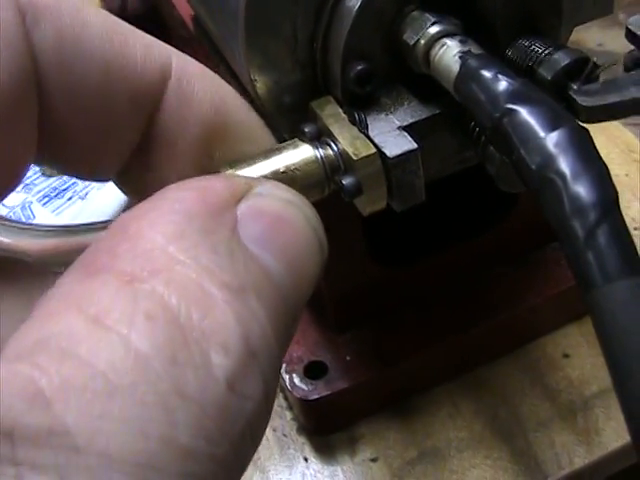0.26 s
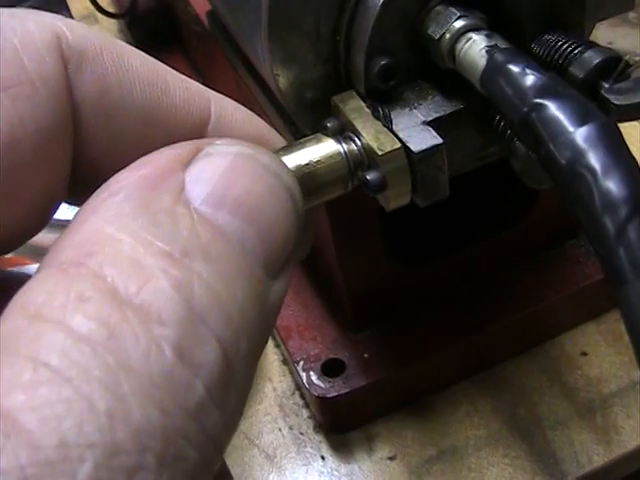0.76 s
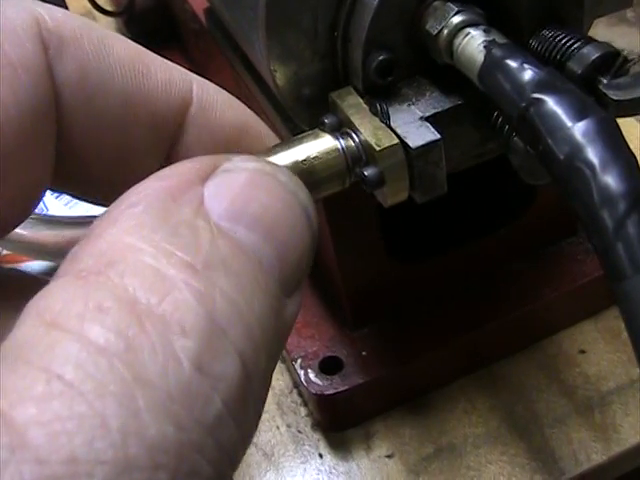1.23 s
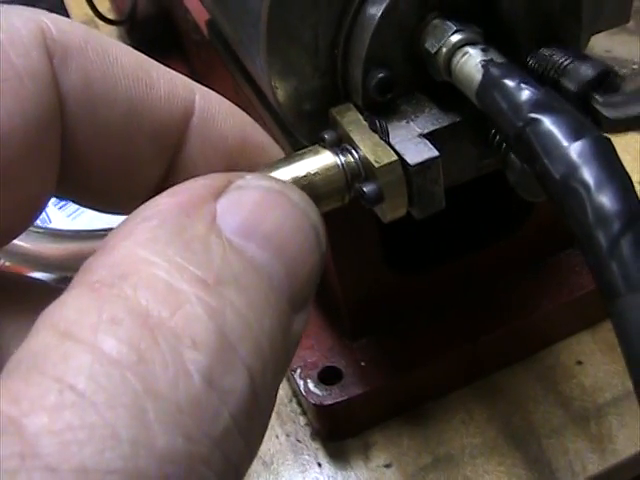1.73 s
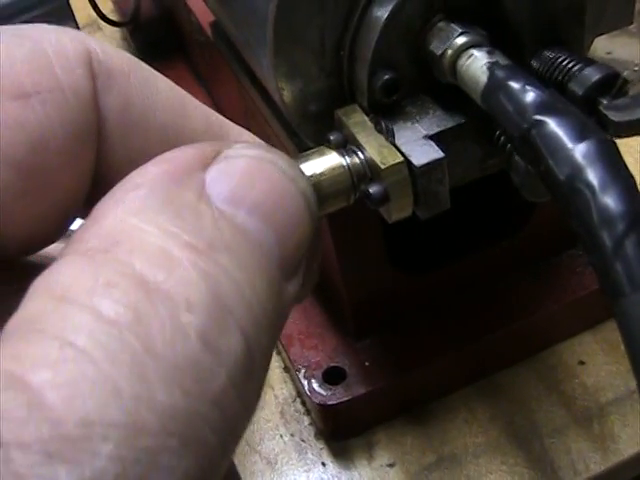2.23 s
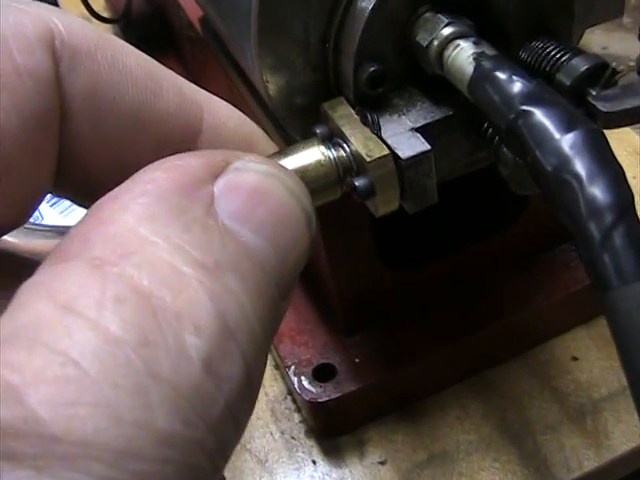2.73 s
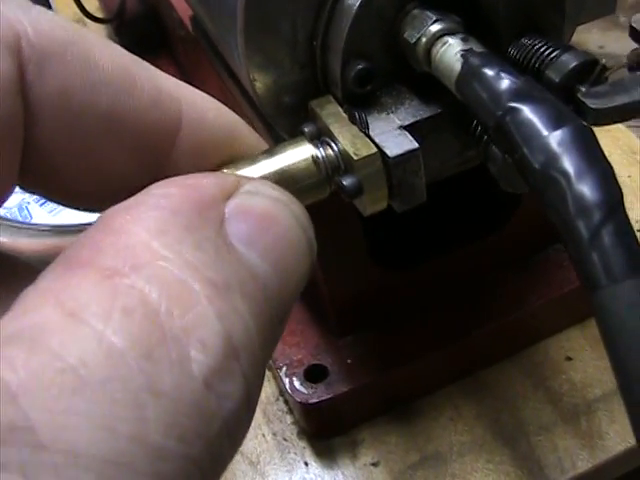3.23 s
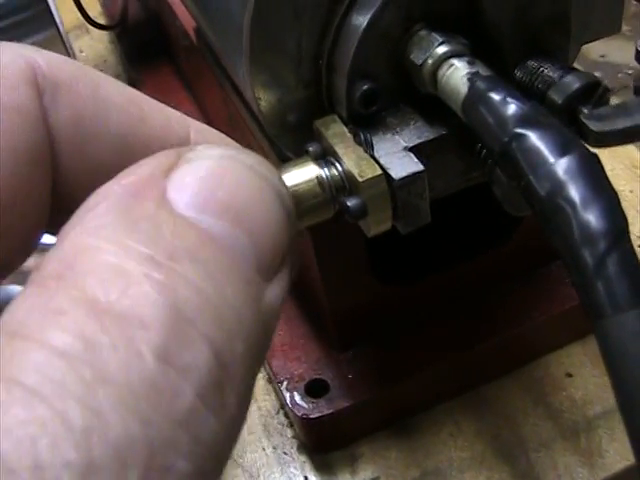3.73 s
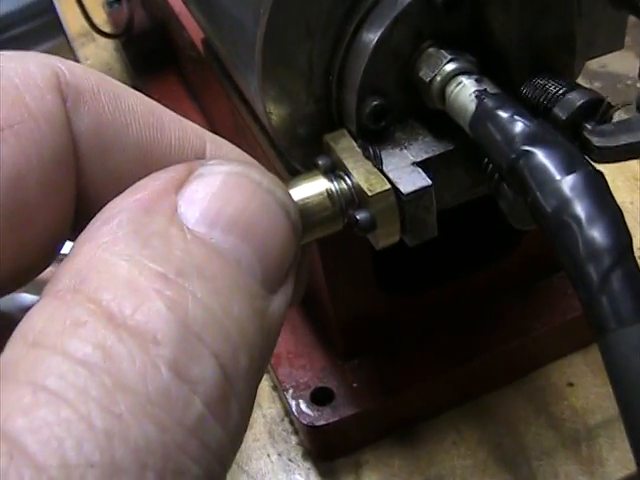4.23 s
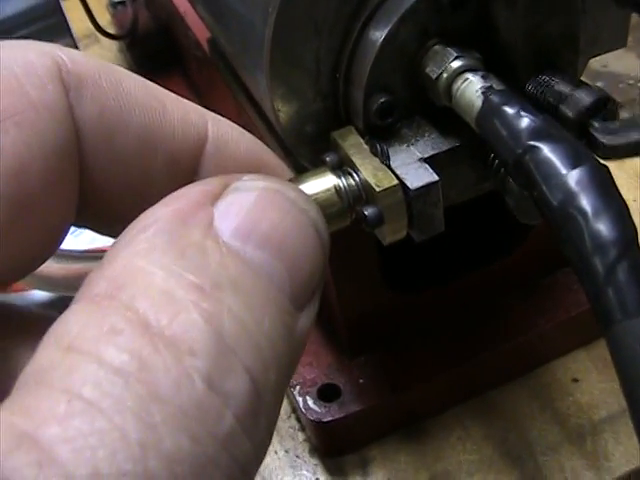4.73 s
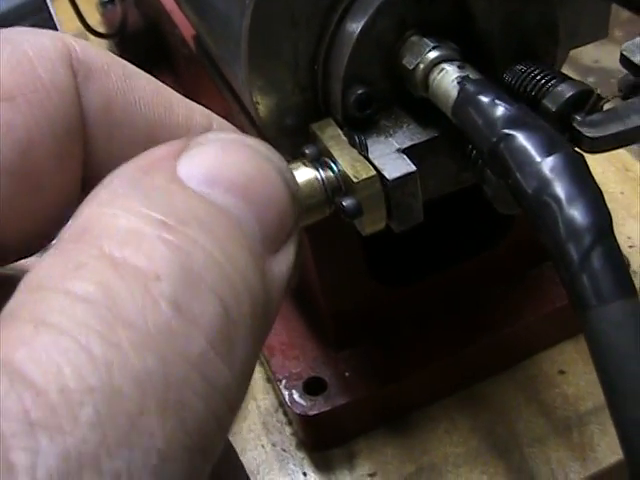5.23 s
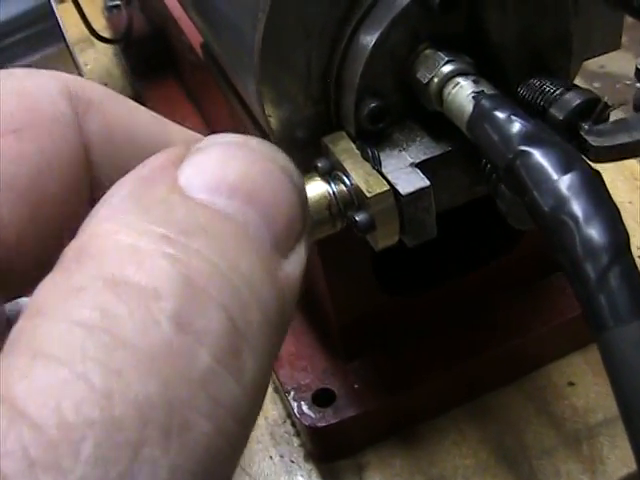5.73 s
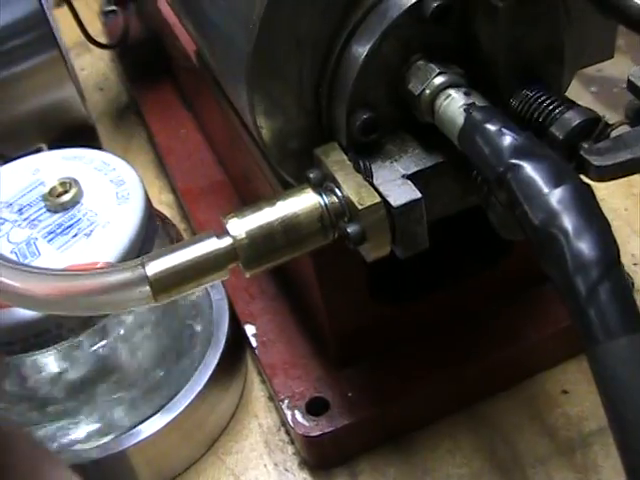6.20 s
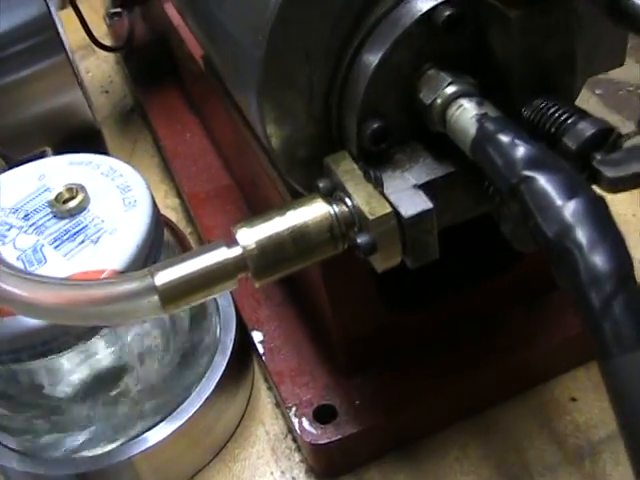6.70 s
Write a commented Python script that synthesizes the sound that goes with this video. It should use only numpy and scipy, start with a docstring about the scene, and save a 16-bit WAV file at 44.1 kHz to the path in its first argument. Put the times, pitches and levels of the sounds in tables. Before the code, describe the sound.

Close mechanical hum, rattling gears and rhythmic airy chuffing from a small single-cylinder engine, which slows and fires in irregular, clipped pops.

```python
"""Heard very close: a small hit-and-miss engine on a wooden bench coasts, then slows and fires in sharp pops.
Coasting, the governor holds the exhaust valve open: the piston pumps air through resonances and parts knock.
As the mixture is turned it slows; air whistles past a fluttering intake valve and pops are pulse plus gas jet.
The gear hums and rattles as shaken resonances; steel parts tick as short noise bursts.
A limiter ducks after peaks above full scale, too late to keep the front of a loud pop from clipping."""
import sys
import numpy as np
from scipy import signal
from scipy.fft import rfft, irfft
from scipy.io import wavfile
from scipy.ndimage import uniform_filter1d

SR = 44100
rng = np.random.default_rng(int(sys.argv[2]) if len(sys.argv) > 2 else 0)


def store_pcm(level_fs):
    """Save levels as 16-bit WAV."""
    pcm = np.round(np.clip(level_fs, -1, 1) * 32767).astype(np.int16)
    wavfile.write(sys.argv[1], SR, np.atleast_2d(pcm).T)


N = 306927
T = np.arange(N) / SR


def amp(db):
    """Level law: decibels to amplitude gain."""
    return 10 ** (np.asarray(db) / 20)


def unit(x):
    """Power normalisation: scales to rms 1."""
    return x / np.sqrt(np.mean(x ** 2) + 1e-20)


def noise():
    """White noise: equal power at all frequencies, for the whole scene."""
    return rng.standard_normal(N)


def add(mix, s, sound):
    """Superposition: adds a sound into the mix at time s."""
    part = mix[max(round(s * SR), 0):][:len(sound)]
    part += sound[:len(part)]


def colour(x, spectrum, size=4096):
    """Minimum-phase filtering to a (Hz, dB) outline; white noise keeps its power."""
    hz, db = np.transpose(spectrum)
    bin_hz = abs(np.fft.fftfreq(size, 1 / SR)) + 1
    log_gain = np.log(amp(np.interp(np.log(bin_hz), np.log(hz), db)))
    min_phase = np.exp(np.conj(signal.hilbert(log_gain)))
    taps = np.fft.ifft(min_phase).real[:size // 2]
    return signal.oaconvolve(x, taps / np.linalg.norm(taps))[:len(x)]


def resonate(x, hz, width):
    """Simple resonance: complex output with gain 1 at a centre that may move."""
    turn = np.exp(2j * np.pi * np.cumsum(hz * np.ones(N)) / SR)
    r = np.exp(-np.pi * width / SR)
    return turn * signal.lfilter([1 - r], [1, -r], x / turn + 1e-18)


def ring(x, modes):
    """Modal superposition: x excites decaying sines; white noise keeps its power."""
    t = np.arange(SR // 5) / SR
    taps = np.zeros(len(t))
    for hz, width, db in modes:
        taps += amp(db) * width * np.exp(-np.pi * width * t) * np.sin(2 * np.pi * hz * t)
    return signal.oaconvolve(x, taps / np.linalg.norm(taps))[:N]


def waver(modes, steady_s):
    """Random excitation: noise-driven resonances beat quickly but keep their strength over steady_s."""
    z = np.zeros(N, complex)
    for hz, width, db in modes:
        shaken = resonate(resonate(noise(), hz, width), hz, width * 4)
        z += amp(db) * np.sqrt(width) * shaken
    power = uniform_filter1d(abs(z) ** 2, int(steady_s * SR) + 1)
    return unit(z.real / np.sqrt(power + 1e-12))


def around(place, outline):
    """Periodicity: reads a (place, dB) outline that repeats every cycle."""
    return np.interp(place, *np.transpose(outline), period=1)


def hump(x, centre, width):
    """Gaussian swell: a smooth rise and fall around one centre."""
    return np.exp(-((x - centre) / width) ** 2)


# Four-stroke cycles. Each row: top dead centre in seconds, exhaust valve held open (0 or 1),
# relative air level in dB, relative knock strength in dB.
CYCLES = [(-.085, 1, -27.5, 2), (0.1153, 1, -29, 1), (0.3138, 1, -29, 0.5), (0.5198, 1, -29, -0.5),
          (0.7281, 1, -30.5, 2.5), (0.9456, 1, -29.5, 2.5), (1.1693, 1, -30, 1.5), (1.402, 0, -31, 6.5),
          (1.6193, 1, -30.5, -1), (1.7903, 1, -29, -2), (1.9673, 1, -29.5, -1.5), (2.151, 1, -29, -3),
          (2.3361, 1, -28, -0.5), (2.5276, 1, -28.5, -1.5), (2.7231, 1, -30, -1), (2.9262, 1, -27.5, 1.5),
          (3.1352, 1, -28, 0.5), (3.3507, 1, -28.5, -0.5), (3.5696, 1, -29, 0), (3.8006, 1, -28.5, -1),
          (4.039, 0, -22, -4), (4.291, 0, -25, -5), (4.544, 0, -22, 0.5), (4.825, 0, -24, 0),
          (5.146, 0, -20.5, -2), (5.492, 0, -24.5, -3.5), (5.817, 0, -21.5, -3.5), (6.172, 0, -28.5, -4),
          (6.488, 0, -20, 0.5), (6.82, 0, -25, -8), (7.15, 0, -27, -5)]


def crank():
    """Kinematics: place in the cycle (0-1), cycles a second, valve held open (0-1) and air gain."""
    s, held, air_db, _ = np.transpose(CYCLES)
    turns = np.interp(T, s, np.arange(len(s)))
    cycle = turns.astype(int)
    speed = np.interp(T, (s[1:] + s[:-1]) / 2, 1 / np.diff(s))
    held_smooth = uniform_filter1d(np.round(held[cycle]), size=200)
    air = amp(uniform_filter1d(air_db[cycle], size=200))
    return turns % 1, speed, held_smooth, air


def cycles():
    """Cycle timing: each as (start s, length s, valve held open 0/1, relative knock strength dB)."""
    return [(s, after[0] - s, round(held), db)
            for (s, held, _, db), after in zip(CYCLES, CYCLES[1:])]


# Hum of the running gear. Each row: time in seconds, relative level in dB.
HUM = [(0.0, -15), (0.8, -16.0), (2.72, -15.5), (4.24, -16), (4.4, -19), (4.64, -13.5), (4.72, -20),
       (4.88, -12.5), (5.04, -21.5), (5.12, -13.5), (5.36, -24.5), (5.52, -17.5), (5.6, -25.5),
       (5.84, -14.0), (6.0, -23.5), (6.32, -21.5), (6.56, -16), (6.72, -27), (6.88, -15.5), (6.95, -23)]
# Swell of the hum through a coasting cycle. Each row: place (0-1), change in dB.
HUM_SWELL = [(0, 0), (.1, 1), (.19, 0.5), (.3, 0), (.45, -3.5), (.52, 2), (.7, 0), (.78, 3.5), (.87, 1)]
# Main hum resonances. Each row: frequency in Hz, width in Hz, relative level in dB.
HUM_MODES = [(438.9, 22, 1.5), (464.6, 26.4, -2), (493.2, 26, -12.5)]
# Broad rumble around the hum. Each row: frequency in Hz, relative density in dB per Hz.
RUMBLE_SPECTRUM = [(25, -37), (70, -7), (160, -17.5), (240, -21), (340, 1), (450, -4), (600, -3.5),
                   (740, -10), (1050, -19), (1800, -15), (3000, -27.5), (7000, -26.5), (11000, -35),
                   (16000, -81)]
# Overtones of the gear. Each row: frequency in Hz, width in Hz, relative level in dB.
GEAR_MODES = [(810, 24, 3), (871, 26, 8), (1177, 32, -2), (1431, 41, 4.5), (1980, 60, -8), (4530, 40, -31)]
# Low drone of the bench. Each row: time in seconds, relative level in dB.
DRONE = [(0, -41.5), (.6, -34.5), (.95, -30.5), (1.8, -35.5), (3.2, -33), (4, -34), (5.2, -31.5),
         (6.3, -39.5), (6.96, -30)]
# The piston shoves the bench once a turn while coasting. Each row: place (0-1), change in dB.
DRONE_COASTING = [(0, -6.5), (.13, 1), (.3, -4), (.45, -5), (.6, 1), (.8, -2.5)]
# Shove on the bench in a working cycle. Each row: place (0-1), change in dB before the working boost.
DRONE_WORKING = [(.07, 3), (.25, -8.5), (.39, -6.5), (.5, -6), (.72, 0), (.9, -10.5)]


def running_gear(place, speed, held, wander_db=0.94, wander_hz=7, working_boost_db=3):
    """Forced vibration: gears and flywheels shake a resonance cluster, weaker overtones and the bench."""
    slow_noise = resonate(resonate(noise(), wander_hz, wander_hz), wander_hz, wander_hz).real
    wander = wander_db * unit(slow_noise)
    hum_db = np.interp(T, *np.transpose(HUM)) + held * around(place, HUM_SWELL) + wander
    hum = amp(hum_db) * waver(HUM_MODES, steady_s=0.056)
    effort = speed / 5  # faster running is louder
    rumble = amp(-30.5) * colour(noise(), RUMBLE_SPECTRUM)
    overtones = amp(-33.5) * ring(noise(), GEAR_MODES)
    working_db = working_boost_db + around(place, DRONE_WORKING)
    shove_db = held * around(place, DRONE_COASTING) + (1 - held) * working_db
    drone_gain = amp(np.interp(T, *np.transpose(DRONE)) + shove_db)
    drone = drone_gain * waver([(114.2, 7.7, 0)], steady_s=0.14)
    return hum + effort * (rumble + overtones) + drone


# Spectrum of rattles and knocks. Each row: frequency in Hz, relative density in dB per Hz.
KNOCK_SPECTRUM = [(300, -20.5), (800, 1.5), (1500, 7.5), (2600, 5), (3300, -2), (5000, 0), (7000, -3.5),
                  (10000, -15.5), (16000, -40)]
# Ringing of the iron frame. Each row: frequency in Hz, width in Hz, relative level in dB.
FRAME = [(1250, 25, -17), (1480, 17, 10.5), (1755, 63, -12.5), (2041, 65, 4), (2546, 132, 2.5),
         (3020, 110, -4), (3850, 540, -5.5), (4546, 51, 1)]


def backlash(place, speed, per_s=300, spread_db=4, top_hz=6500):
    """Random impacts: gear teeth rattle most where the piston turns round and the load reverses."""
    strength = amp(spread_db * np.minimum(rng.exponential(1, N), 3))
    clicks = (rng.random(N) < per_s / SR) * strength
    t = np.arange(SR // 50) / SR
    energy = signal.oaconvolve(clicks ** 2, np.exp(-t / 0.0012))[:N]
    chatter = unit(np.sqrt(abs(energy)) * noise())
    reversal = np.cos(4 * np.pi * (place + 0.028)) ** 2
    chatter *= (0.11 + reversal) * (speed / 5) ** 1.07
    rattle = amp(-35) * colour(chatter, KNOCK_SPECTRUM) + amp(-37.0) * ring(chatter, FRAME)
    return signal.sosfilt(signal.butter(3, top_hz, fs=SR, output="sos"), rattle)


# Hiss past the intake valve. Each row: frequency in Hz, relative density in dB per Hz.
INTAKE_SPECTRUM = [(400, 11), (1500, 3.5), (2900, -3), (3700, 7), (5300, 2), (6000, 0.5), (7800, 2),
                   (9300, 2.5), (10200, -5.5), (13000, -1.5), (16000, -5.5)]
# Leak of compressed charge. Each row: frequency in Hz, relative density in dB per Hz.
LEAK_SPECTRUM = [(800, -24), (1600, -1), (2400, -6), (4000, -22), (6500, 0), (8500, 9), (10500, -3),
                 (14000, 4), (16000, -2)]


def intake_air(place, held, air, flutter_hz=117):
    """Flow modulation: on a working cycle the intake valve flutters and whistles; then the charge leaks."""
    suck = np.interp(place, [.005, .03, .15, .19, .24], [0.099, 0.98, 0.71, 0.54, 0.055])
    unsteady_hz = flutter_hz * (1 + 1.5 * uniform_filter1d(noise(), size=900))
    flutter = 1 + .55 * np.cos(2 * np.pi * np.cumsum(unsteady_hz) / SR)
    hiss = amp(-1.0) * colour(noise() * flutter * suck, INTAKE_SPECTRUM)
    whistle_gain = amp(np.interp(T, [4.9, 5.2], [-6, -13]))  # fades as the collar is turned
    whistle = whistle_gain * ring(noise() * suck ** 2, [(9130, 67, 0)])
    leak = amp(-13.5) * colour(noise() * hump(place, centre=0.49, width=0.067), LEAK_SPECTRUM)
    return (1 - held) * air * (hiss + whistle + leak)


# Resonances of the exhaust passage. Each row: frequency in Hz, width in Hz, relative level in dB.
PIPE = [(1920, 1200, -5.5), (4874, 530, 0.5), (5867, 215, 3.5), (6800, 2600, -12), (8340, 350, -3.5),
        (9580, 570, -10.5), (11000, 220, -10), (13900, 460, -15), (15500, 800, -13.5)]
# Air in each of the four strokes. Each entry: relative level in dB.
STROKE_DB = [1.8, -1.5, 2.5, -2]


def exhaust_air(place, held, air, rod=0.12, shift=0.0034):
    """Turbulent flow noise: the piston pumps air; fast flow is brighter and pulls the pipe resonances."""
    angle = 4 * np.pi * place
    flow = np.sin(angle) * (1 + rod * np.cos(angle))  # the connecting rod: faster piston near the head
    stroke = amp(np.array(STROKE_DB)[(place * len(STROKE_DB)).astype(int)])
    valve = held + (1 - held) * amp(-11.5) * (place > 3 / 4)  # working: open in the last stroke only
    out = np.zeros(N)
    for hz, width, db in PIPE:
        rush = noise() * (abs(flow) + 0.064) ** (1.37 + hz / 9000) * stroke * valve * air
        centre_hz = hz * (1 + shift * np.tanh(2 * flow))
        out += amp(db) * resonate(resonate(rush, centre_hz, width), centre_hz, width * 3).real
    return amp(15.5) * out


# Valve spring left ringing by a hard blow. Each row: start in seconds, frequency in Hz, relative level in dB.
SPRING = [(1.429, 8200, -29), (5.146, 4500, -37), (5.82, 4530, -35)]


def spring(decay_s=0.05):
    """Free vibration: a thin steel tone dies away exponentially after the blow."""
    t, out = np.arange(SR // 2) / SR, np.zeros(N)
    for s, hz, db in SPRING:
        add(out, s, amp(db) * np.exp(-t / decay_s) * np.sin(2 * np.pi * hz * t))
    return out


def contacts(rows, rise_s, decay_s, tail_db, tail_s):
    """Impact noise: each loose contact builds up, chatters for a few milliseconds and dies away."""
    t, out = np.arange(SR // 10) / SR, np.zeros(N)
    decay = np.exp(-t / decay_s) + amp(tail_db) * np.exp(-t / tail_s)
    shape = (1 - np.exp(-(t / rise_s) ** 2)) * decay
    for s, db in rows:
        add(out, s, amp(db) * shape / shape.max() * rng.standard_normal(len(t)))
    return out


# Knocks of rod, cam and push rod. Each row: valve held open (0 or 1) when it sounds, place (0-1),
# relative level in dB, treble against that level in dB.
KNOCKS = [(1, 0, -21, -23), (1, .2, -24.5, -13), (1, .52, -19.5, -4), (1, 0.8, -30.5, -17),
          (1, .712, -15, -7), (1, .952, -11.5, -2.5), (0, 0, -19, -6), (0, 0.1, -15, -14),
          (0, .5, -33.5, 13), (0, .67, -26, -12)]
# Further ticks and knocks heard on their own, outside the rules. Each row: time in seconds, relative level in
# dB.
TICKS = [(4.1694, -15.5), (4.4163, -19), (4.4627, -22.5), (4.6718, -15.5), (4.7535, -22.5), (4.892, -24),
         (4.9493, -21), (5.039, -23.5), (5.7074, -25), (6.1741, -20.5), (6.549, -21), (6.669, -23.5)]
# Ignition contact closing and opening. Each row: place (0-1), relative level in dB.
CONTACT = [(.382, -25.5), (0.899, -26.5)]
# Spectrum of small ticks. Each row: frequency in Hz, relative density in dB per Hz.
TICK_SPECTRUM = [(1000, 11), (4000, 4), (5200, 5.5), (6700, 12.5), (8000, 8.5), (11000, -0.5), (12700, 2),
                 (16000, -2)]
# Spectrum of the governor pawl. Each row: frequency in Hz, relative density in dB per Hz.
PAWL_SPECTRUM = [(3000, -30), (9000, -8), (12000, -6), (14000, 1), (16000, -3)]


def linkage(lead_s=.0015, uneven_db=0.57, pawl_place=0.443, pawl_db=-28, slow_cycle_s=.3):
    """Impact excitation: knocks at fixed crank angles ring the iron frame; small steel parts tick."""
    knocks, pawl, ignition = [], [], []
    for start, length, held, strength_db in cycles():
        for when_held, place, db, treble_db in KNOCKS:
            if round(when_held) == held:
                knocks.append((start + place * length, db + strength_db, treble_db))
        if held:  # the pawl clicks once in each coasting cycle
            pawl.append((start + pawl_place * length, pawl_db))
        if length > slow_cycle_s:  # the ignition contact is heard only in long cycles
            ignition += [(start + place * length, db) for place, db in CONTACT]
    knocks = np.array(knocks)
    s, db, treble_db = knocks[knocks[:, 0] > 0].T
    db = db + uneven_db * rng.standard_normal(len(s))  # never quite alike
    blows = contacts(zip(s - lead_s, db), rise_s=0.0034, decay_s=0.003, tail_db=-20.5, tail_s=0.019)
    edges = contacts(zip(s, db + treble_db), rise_s=0.00062, decay_s=0.0025, tail_db=-22, tail_s=0.016)
    ticks = contacts(list(TICKS) + ignition, rise_s=.001, decay_s=.0028, tail_db=-22, tail_s=.012)
    clicks = contacts(pawl, rise_s=.0008, decay_s=0.001, tail_db=-31, tail_s=0.0053)
    frame = amp(-8.0) * colour(blows, KNOCK_SPECTRUM) + amp(-9.0) * ring(blows, FRAME)
    treble = amp(-6.0) * colour(edges, TICK_SPECTRUM) + colour(ticks, TICK_SPECTRUM)
    return frame + treble + colour(clicks, PAWL_SPECTRUM)


# Firings, spits and slow burns. Each row: start in seconds, pressure pulse in dB, gas jet in dB,
# jet length in seconds, port ring in dB, after-hiss in dB (all levels relative).
POPS = [(1.4294, 2, -11.5, 0.0041, 0, -29), (1.4386, -8, -13.5, 0.0055, -5, -44),
        (1.531, -35, -26, 0.087, -36, -48), (1.5624, 14, 0, 0.0088, -10, -25),
        (4.049, -11, -11.5, 0.0034, -1, -50), (4.212, 9, -5.5, 0.0078, -24, -30),
        (5.3928, 4, -1.5, .010, 2, -27), (5.713, -33, -23, 0.0063, -13, -60),
        (6.0670, -3, -6, 0.0089, -2, -31.5), (6.3808, -19, -13.5, 0.0066, -14, -43),
        (6.7277, 6, -2.5, 0.011, 0.5, -25)]
# Soft low puffs of slow burns. Each row: start in seconds, relative level in dB, frequency in Hz.
PUFFS = [(1.542, -8.5, 80.6), (4.46, -28, 130), (4.734, -25, 150), (5.714, -17, 144), (6.383, -15, 122)]
# Spectrum of the gas jet. Each row: frequency in Hz, relative density in dB per Hz.
JET_SPECTRUM = [(150, -1), (600, -1.5), (1100, -2), (2300, -8), (4000, -13.5), (5500, -1.5), (8000, -1),
                (10500, -6), (13000, -13), (16000, -5.5)]


def firings(pulse_s=0.00078, port_hz=620, port_s=0.0022, after_s=0.048):
    """Blast wave and jet noise: a pulse rings the port, a jet of gas tears after it, the rest hisses out."""
    t = np.arange(SR // 4) / SR
    pulses, jets, rest = np.zeros((3, N))
    for s, pulse_db, jet_db, length, port_db, after_db in POPS:
        u = t / pulse_s
        add(pulses, s, -amp(pulse_db + 19.5) * u * (1 - u) * np.exp(-u * 3.7))
        add(pulses, s, -amp(port_db) * np.exp(-t / port_s) * np.sin(2 * np.pi * port_hz * t))
        tearing = amp(4.13 * unit(uniform_filter1d(rng.standard_normal(len(t)), size=60)))
        jet_gain = amp(jet_db) * np.exp(-(t / length) ** 3)
        add(jets, s + pulse_s, jet_gain * tearing * rng.standard_normal(len(t)))
        crack = amp(jet_db - 22) * hump(t, centre=0.0022, width=0.0052)  # the valve cracks open
        add(jets, s - .004, crack * rng.standard_normal(len(t)))
        after = amp(after_db) * (t / after_s) * np.exp(1 - t / after_s)
        add(rest, s, after * rng.standard_normal(len(t)))
    for s, db, hz in PUFFS:
        u = t * hz
        add(pulses, s, amp(db) * u * np.exp(1 - u * 1.23) * -np.sin(2 * np.pi * u))
    after_hiss = colour(rest, TICK_SPECTRUM) * amp(-5.0) + colour(rest, LEAK_SPECTRUM) * amp(-33.0)
    return pulses + colour(jets, JET_SPECTRUM) + after_hiss


# Scattered sound. Each row: frequency in Hz, relative level in dB.
SIDE_SPECTRUM = [(100, -28), (450, -55), (1000, -75), (2000, -7.5), (5000, -5.5), (9000, 0), (16000, 0)]


def scatter_to_sides(x, side_db=-7):
    """Diffuse scattering: bench and nearby things spread the treble to the sides; bass stays central."""
    t = np.arange(SR // 25) / SR
    echoes = rng.standard_normal(len(t)) * np.exp(-t / .008)
    all_pass = irfft(np.exp(1j * np.angle(rfft(echoes))))  # even over frequency
    scatter = all_pass * np.exp(-t / 0.15)
    side = amp(side_db) * colour(signal.oaconvolve(x, scatter)[:N], SIDE_SPECTRUM)
    return np.array([x + side, x - side]) * amp([[-.6], [.6]])  # right slightly louder


def scene():
    """Superposition of all parts of the engine, timed by its crank."""
    place, speed, held, air = crank()
    gear = running_gear(place, speed, held) + backlash(place, speed)
    gas = intake_air(place, held, air) + exhaust_air(place, held, air) + firings()
    return scatter_to_sides(gear + spring() + linkage() + gas)


def record(dry, limit_db=0, recover_db_per_s=75, attack_s=0.0097, low_cut_hz=42, deepest_db=12,
           top_hz=16060):
    """Gain limiting: the level ducks after peaks, too late to stop their fronts clipping; then a band limit."""
    dry = signal.sosfilt(signal.butter(2, low_cut_hz, "high", fs=SR, output="sos"), dry)
    peak_db = 20 * np.log10(abs(dry).max(0) + 1e-9)  # the louder side governs both
    over_db = np.clip(peak_db - limit_db, 0, deepest_db)
    recovery = T * recover_db_per_s
    held_db = np.maximum.accumulate(over_db + recovery) - recovery
    r = np.exp(-1 / (attack_s * SR))
    duck_db = signal.lfilter([1 - r], [1, -r], held_db)
    clipped = np.clip(dry * amp(-duck_db), -1, 1)
    low_pass = signal.firwin(1023, top_hz, window=("kaiser", 8), fs=SR)
    return signal.oaconvolve(clipped, low_pass[None], "same", axes=1)


dry = scene()
out = record(dry)
store_pcm(out)
```